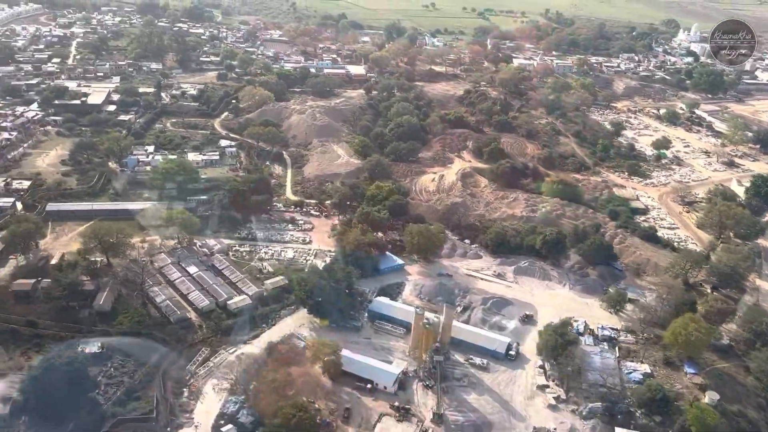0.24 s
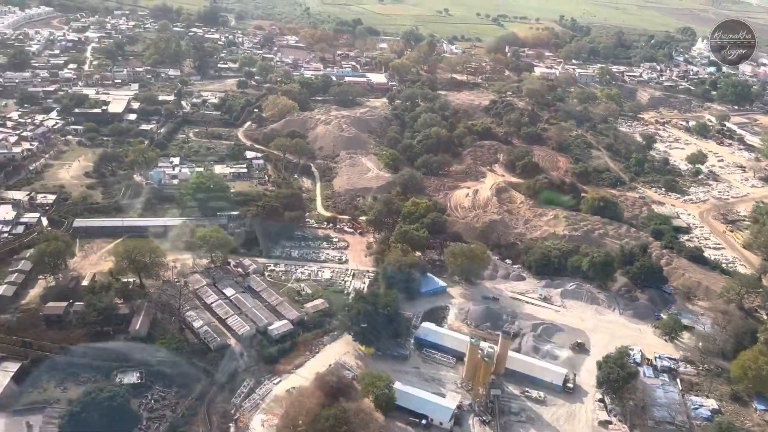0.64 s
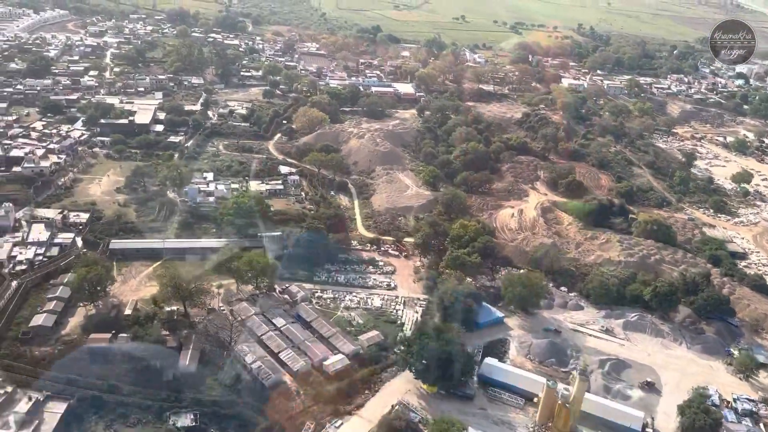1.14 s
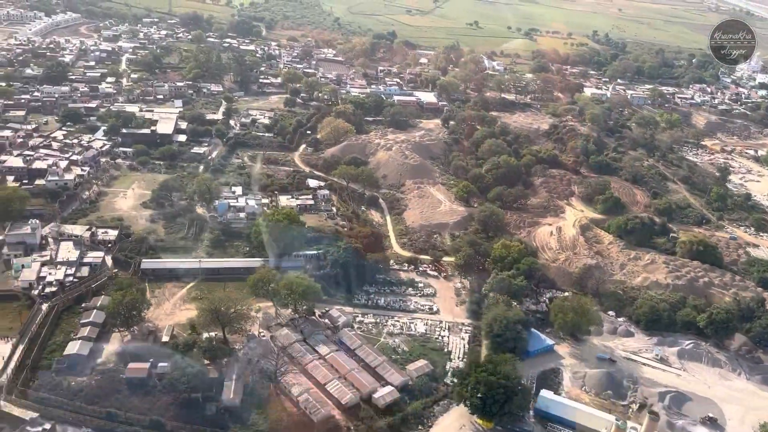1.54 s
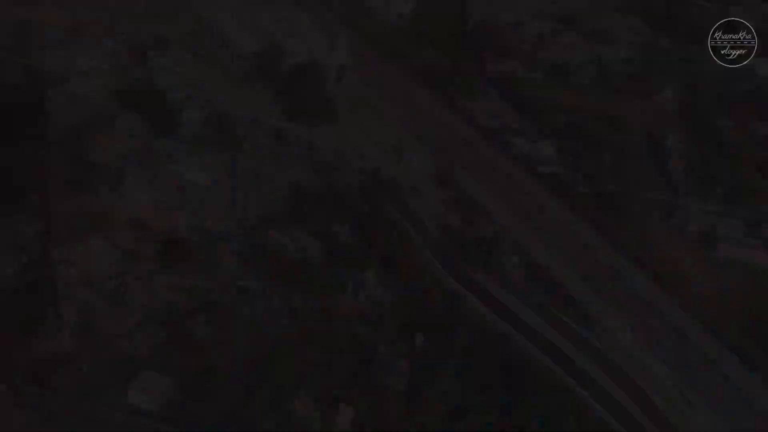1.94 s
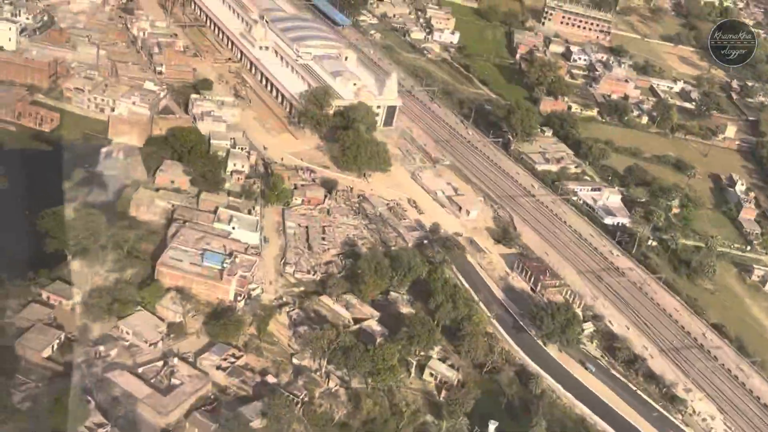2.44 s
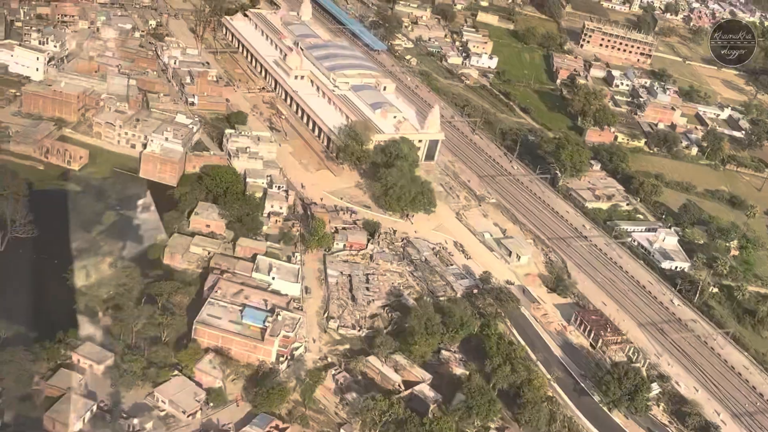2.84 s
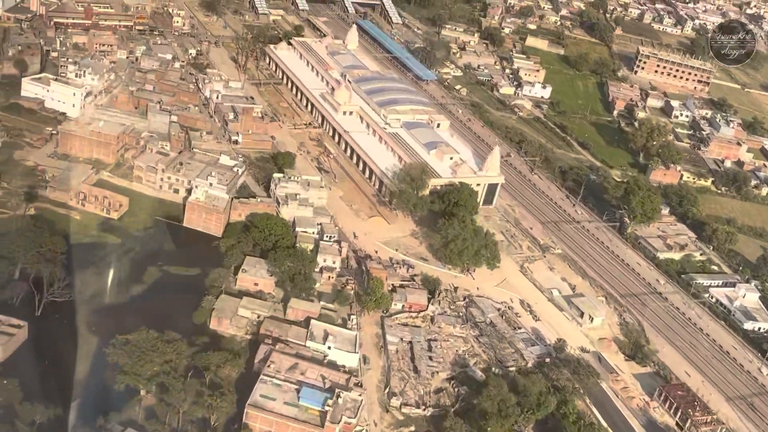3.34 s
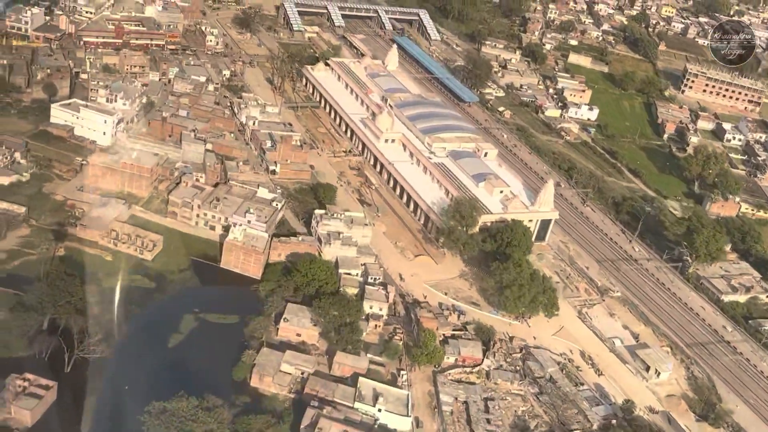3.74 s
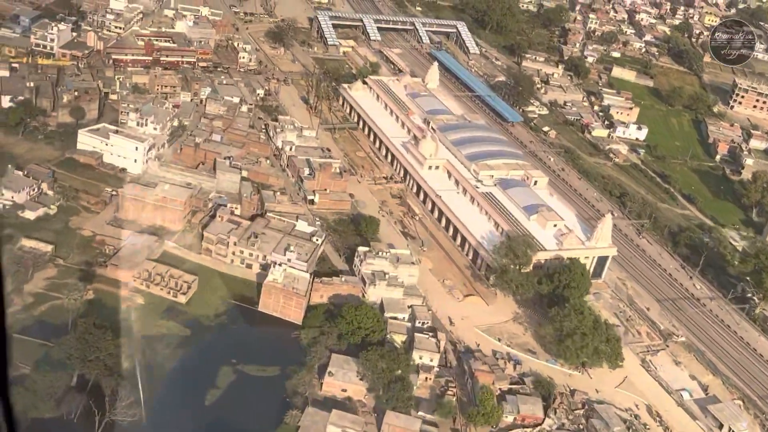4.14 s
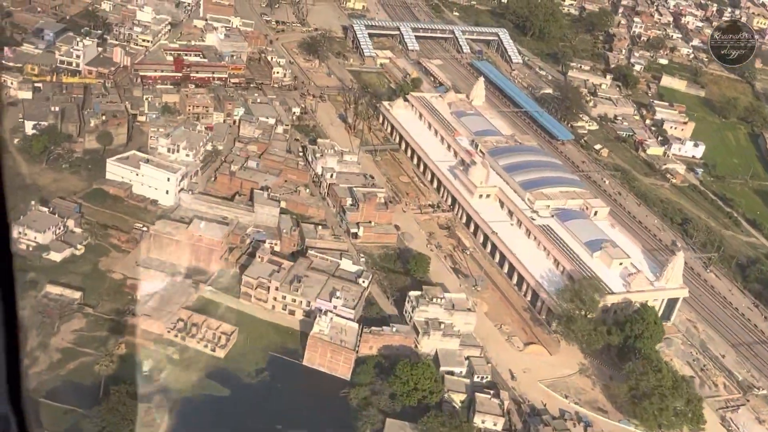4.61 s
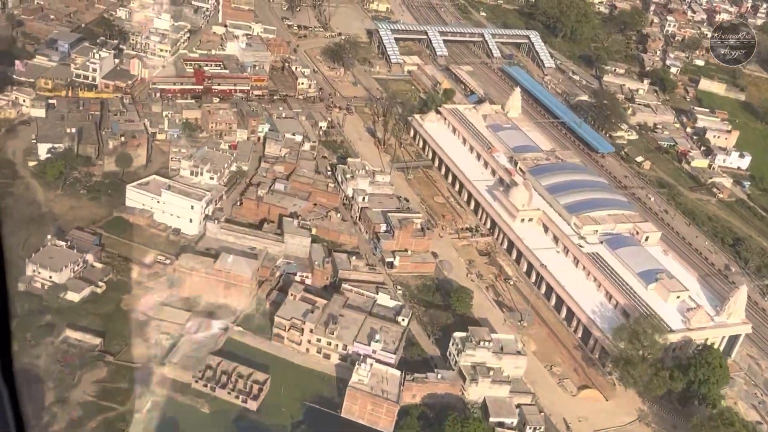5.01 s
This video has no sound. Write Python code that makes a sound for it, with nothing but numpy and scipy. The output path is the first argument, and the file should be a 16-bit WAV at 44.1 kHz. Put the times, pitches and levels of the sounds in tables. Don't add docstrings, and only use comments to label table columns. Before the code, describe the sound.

The cabin of a helicopter cruising over a town, heard by two close microphones in wide stereo. From the start a loud, dense low rumble buffets and throbs at the blade rate, with a low-mid roar through the panels. On top, hard short knocks rattle about nineteen times per second, slightly uneven in strength, each with a dry metallic tick and often a tiny very high squeak. Bright air and turbine hiss flickers; a faint unsteady whistle near 1.25 kHz and thin gear whines run through it. From about 1.5 seconds everything fades evenly, reaching silence around 1.95. A second stretch immediately fades in, full by about 2.35 seconds: the same drone and fast knocking, with a somewhat different, drier clatter. The whistle creeps up in pitch, then drops after 4 seconds. Hiss gradually strengthens, knocks peak near 4.6, and the drone continues until the cut at about 5.3 seconds.

```python
import sys
import numpy as np
from scipy import signal
from scipy.fft import rfft, irfft
from scipy.io import wavfile

SR = 44100
rng = np.random.default_rng(int(sys.argv[2]) if len(sys.argv) > 2 else 0)


def voltage_ratio(level):
    return 10 ** (np.asarray(level, float) / 20)


def int16_out(signal):
    q = np.round(np.clip(np.atleast_2d(signal).T, -1, 1) * 32767)
    wavfile.write(sys.argv[1], SR, q.astype(np.int16))


N = 232495
TIME = np.arange(N) / SR
HZ = np.maximum(np.arange(N // 2 + 1) * SR / N, 1)
CUT_S = 1.9465

BLADE_RATE = [19.35, 19.34]
FIRST_PASS = [0.0028, 2.0604]


def rms_one(x):
    return x / np.sqrt(np.mean(x ** 2) + 1e-20)


def along(rows, at, warp=lambda v: v):
    first, *columns = np.transpose(rows)
    return [np.interp(warp(at), warp(first), c) for c in columns]


def coloured(spectrum):
    (low_hz, low_db), (high_hz, high_db) = spectrum[0], spectrum[-1]
    shape = [(low_hz / 2, low_db - 41), *spectrum, (high_hz * 1.2, high_db - 40)]
    white = rfft(rng.standard_normal((2, N)))
    return rms_one(irfft(white * voltage_ratio(along(shape, HZ, np.log)[0]), N))


def drift(rate_hz):
    return rms_one(irfft(rfft(rng.standard_normal(N)) / (1 + (HZ / rate_hz) ** 2), N))


def narrow(hz, width_hz, steady=0):
    turn = 2 * np.pi * np.cumsum(hz + np.zeros(N)) / SR
    pair = []
    for _ in range(2):
        in_phase = (steady + drift(width_hz)) * np.cos(turn)
        pair.append(in_phase + drift(width_hz) * np.sin(turn))
    return rms_one(np.array(pair))


def rumble(level_db):
    # (frequency [Hz], level [dB per Hz])
    rumble_shape = [(24, -29), (33, -26), (50, -9), (70, 0.5), (100, 0.5), (130, -2.5), (160, -1),
                    (200, -4.5), (260, -8), (340, -21.5)]
    return voltage_ratio(level_db + 0.78 * drift(13)) * coloured(rumble_shape)


def roar(k, level_db):
    # (frequency [Hz], level [dB per Hz])
    roar_shapes = [
        [(140, -37), (240, -1), (324, -6), (377, -2.5), (442, -9), (522, -7), (682, -16), (810, -15),
         (1100, -28.5), (1430, -59), (2420, -120)],
        [(140, -26.5), (240, -1.5), (312, -5), (372, -4.5), (442, -10), (481, -8), (632, -17), (682, -18),
         (1100, -24), (1430, -58), (2420, -120)],
    ]
    return voltage_ratio(level_db + 2.0 + 0.85 * drift(5.1)) * coloured(roar_shapes[k])


def patchy(x, swell_db, rate_hz):
    borders_hz = [0, 1500, 2100, 2900, 4000, 5500, 8000, 11000, SR]
    spectrum, out = rfft(x), 0
    for low, high in zip(borders_hz, borders_hz[1:]):
        part = irfft(spectrum * ((HZ >= low) & (HZ < high)), N)
        out = out + voltage_ratio(swell_db * drift(rate_hz)) * part
    return out


def hiss(k, level_db):
    # (frequency [Hz], level [dB per Hz])
    hiss_shapes = [
        [(800, -20), (1000, 0), (1600, -1), (2500, -8), (4500, -10), (5500, -17), (7500, -18.5), (10000, -20.5),
         (10700, -20.5), (11500, -21), (13400, -21), (14500, -29), (15700, -25)],
        [(800, -56), (1000, -1.5), (1700, -2.5), (2600, -5), (3500, -9), (5000, -14), (5500, -16),
         (6500, -15.5), (7700, -20), (10000, -19.5), (11500, -17.5), (12500, -21), (14500, -22), (15700, -22)],
    ]
    hiss_rise = [0.2, 0.62]
    level_db = level_db + hiss_rise[k] * (TIME - FIRST_PASS[k])
    air = patchy(coloured(hiss_shapes[k]), swell_db=0.96, rate_hz=3.7)
    return voltage_ratio(level_db + 3.5 + 0.69 * drift(38)) * air


def vent_whistle():
    # (time [s], frequency [Hz], level [dB])
    vent_path = [(0, 1259, -37.5), (.8, 1247, -38), (1.6, 1274, -39), (2.3, 1270, -43), (2.8, 1304, -41.5),
                 (3.6, 1320, -43.5), (4.1, 1325, -38), (4.7, 1240, -38), (5.27, 1237, -41)]
    vent_hz, vent_db = along(vent_path, TIME)
    return voltage_ratio(vent_db) * narrow(vent_hz, 91)


def whine(k):
    # (frequency [Hz], width [Hz], steadiness [1], first level [dB], second level [dB])
    whine_tones = [(376, 18, 0, -36, -34), (645, 12, .6, -42, -44), (1500, 40, 0, -56, -50),
                   (1760, 60, 0, -52, -58), (1704, 2, 4, -48.5, -54), (2105, 20, 0, -66, -60),
                   (2450, 60, 0, -58, -54), (3225, 2.5, 2.5, -67, -62)]
    return sum(voltage_ratio(db[k]) * narrow(hz, width_hz, steady) for hz, width_hz, steady, *db in whine_tones)


def throb(k):
    # (multiple of the rate [1], level [dB rms])
    throb_tones = [
        [(2, -28), (3, -27.5), (4, -24), (5, -29.5), (6, -38.5), (7, -45)],
        [(2, -29.5), (3, -29), (4, -28), (5, -29), (7, -39.5), (8, -34.5)],
    ]
    turn = 2 * np.pi * BLADE_RATE[k] * TIME
    out = np.zeros(N)
    for multiple, db in throb_tones[k]:
        swell = voltage_ratio(db + 0.48 * drift(0.94)) * np.sqrt(2)
        out += swell * np.cos(multiple * turn + rng.uniform(0, 2 * np.pi))
    return out


def blade_passes(k):
    # (time [s], peak level [dB])
    looseness = [(0, -41.5), (.5, -39), (.6, -44), (1.05, -43), (1.22, -38), (1.55, -36.5), (1.8, -44),
                 (2.2, -40), (2.52, -45), (2.95, -40.5), (3.5, -39.5), (4.3, -40.5), (4.62, -36.5),
                 (5.27, -39)]
    jitter_s, spread_db = .001, 1.5
    at = np.arange(FIRST_PASS[k], [CUT_S, N / SR][k], 1 / BLADE_RATE[k])
    chance = rng.standard_normal((len(at), 2))
    return at + jitter_s * chance[:, 0], along(looseness, at)[0] + spread_db * chance[:, 1]


def squeaks(knock_s):
    out, age = np.zeros(N), np.arange(-200, 200) / SR
    for s, (early, loud) in zip(knock_s, rng.random((len(knock_s), 2))):
        lead_s = .015 * early
        hz = 12300 - 1500 * np.exp(-lead_s / 0.0065)
        at = int((s - lead_s) * SR) - 200
        if 0 < at < N - 400:
            swell = voltage_ratio(-55.5 + 21.3 * loud) * np.exp(-(age / .0018) ** 2)
            out[at:at + 400] += swell * np.sin(2 * np.pi * hz * age)
    return out


def ring(clicks, hz, t60):
    r, w = voltage_ratio(-60 / (t60 * SR)), 2 * np.pi * hz / SR
    return signal.lfilter([0, np.sin(w)], [1, -2 * r * np.cos(w), r * r], clicks + 1e-18)


def train(times, gains):
    return np.bincount(np.clip(times * SR, 0, N - 1).astype(int), gains, N)


def knocks(k, at, db):
    # (frequency [Hz], level [dB], t60 [s])
    fitting_modes = [
        [(2560, 5, 0.014), (4380, 7.5, .010), (7000, -5, 0.0074), (7940, -1, 0.009), (10680, 6, .008),
         (12900, -9, .008)],
        [(2396, 12.5, 0.0075), (5020, 5.5, 0.0083), (6600, 8.5, 0.0025), (9940, 1, .006), (10550, -2, .006),
         (12700, -6, .006)],
    ]
    # (frequency [Hz], level [dB per Hz])
    rattle_shapes = [
        [(1000, -14), (2500, -2.5), (4500, -5.5), (6500, -14), (10700, -9.5), (13000, -14), (15700, -24)],
        [(1000, -20), (2400, 6.5), (3500, -8), (5000, -1.5), (8500, -12.5), (11000, -12.5), (15700, -28)],
    ]
    modes = fitting_modes[k]
    chance = rng.standard_normal((len(at), 2 + 2 * len(modes)))
    pair = np.zeros((2, N))
    for m, (hz, mode_db, t60) in enumerate(modes):
        for half in (0, 1):
            strike_db = db + mode_db - 3.0 + 1.6 * chance[:, 2 + 2 * m + half]
            pair[half] += ring(train(at + .0004, voltage_ratio(strike_db)), hz, t60)
    clicks = train(at, voltage_ratio(db + 2.5))
    clicks = clicks + train(at - .018 + 0.0017 * chance[:, 0], voltage_ratio(-48 + 3.4 * chance[:, 1]))
    age = np.arange(800) / SR
    burst = (1 - np.exp(-age / 0.00056)) * np.exp(-age / 0.0035)
    return pair + signal.fftconvolve(clicks, burst / burst.max())[:N] * coloured(rattle_shapes[k])


def ports(k, pair):
    # (frequency [Hz], likeness [0-1], right leads [rad], left minus right [dB])
    bass_ports = [(38, 0.8, 0, -4), (75, 0.95, 0.061, -.5), (150, 0.88, -0.052, -0.8),
                  (388, 0.84, 0.041, -2.5)]
    # (frequency [Hz], likeness [0-1], right leads [rad], left minus right [dB])
    upper_ports = [
        [(533, 0.42, .3, -2.5), (646, 0.8, 1.7, -5.5), (766, 0.44, 1.14, -2), (1000, 0.5, 2.55, -3.5),
         (1310, .6, 4.32, 3.5), (2580, 0.47, 5.85, -1), (3860, 0.1, 7.8, -3), (4370, 0.2, 12.4, -5),
         (5220, 0.4, 14.4, -7), (6500, 0.4, 17.5, -0.5), (7660, 0.44, 12.6, 0), (9650, 1, 11.8, 0),
         (11900, .85, 10.3, -1), (13800, .85, 9.4, 0), (14700, .8, 6.4, 0)],
        [(770, 0.51, 0.9, -3.5), (960, 0.45, 1.66, -3), (1320, 0.36, 0.15, 1), (1800, 0.43, -0.5, 1),
         (2966, 0.99, 0.92, 2), (3980, 0.96, -0.5, -1.5), (5000, 1, 0.5, -3), (5250, .55, -2.2, 0),
         (6900, .85, -3.14, 0), (7350, .7, -4.2, 0), (7750, .9, -6.28, 0), (9700, .9, -6.4, 0),
         (11600, 0.6, -9, -1), (13800, 0.9, -11, 0), (14800, .8, -11, 0)],
    ]
    alike, lead, pan_db = along(bass_ports + upper_ports[k], HZ)
    alike = np.clip(alike, 0, 1)
    shared, own = rfft(pair) * np.sqrt([(1 + alike) / 2, (1 - alike) / 2])
    turn = np.exp(.5j * lead) / voltage_ratio(pan_db / 2)
    return irfft([(shared + own) / turn, (shared - own) * turn], N)


def cabin(k):
    # (rumble [dB], roar [dB], hiss [dB])
    cruise = [(-19.5, -25, -40.5), (-18, -26, -44)]
    rumble_db, roar_db, hiss_db = cruise[k]
    at, db = blade_passes(k)
    around = rumble(rumble_db) + roar(k, roar_db) + hiss(k, hiss_db)
    around += vent_whistle() + whine(k) + knocks(k, at, db)
    return ports(k, around + (throb(k) + squeaks(at)) * [[1], [0]])


def scene():
    fade_out_s, fade_in_s, floor_db = 0.42, 0.4, -61.5
    first = TIME < CUT_S
    ramp = np.where(first, (CUT_S - TIME) / fade_out_s, (TIME - CUT_S) / fade_in_s)
    return np.clip(ramp, voltage_ratio(floor_db), 1) * np.where(first, cabin(0), cabin(1))


def low_pass(x):
    return signal.sosfilt(signal.butter(12, 17090, fs=SR, output="sos"), x)


def record(dry):
    return low_pass(1.534 * np.tanh(dry / 1.467))


dry = scene()
out = record(dry)
int16_out(out)
```